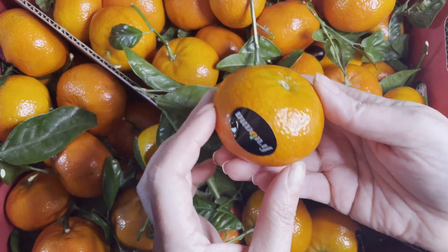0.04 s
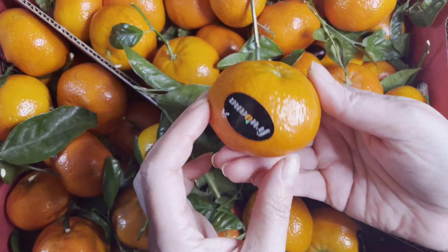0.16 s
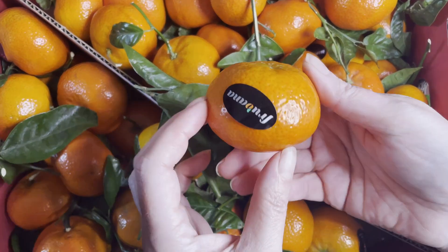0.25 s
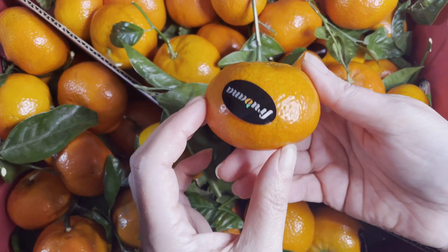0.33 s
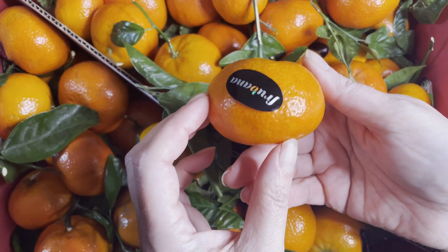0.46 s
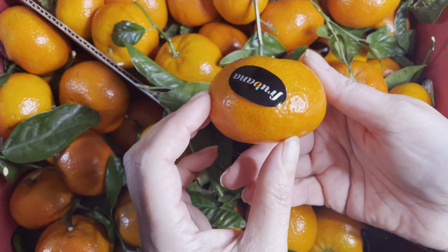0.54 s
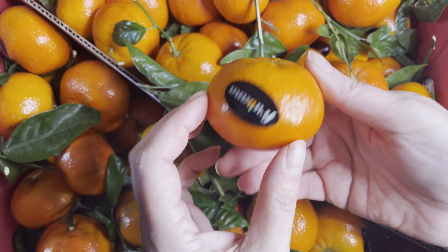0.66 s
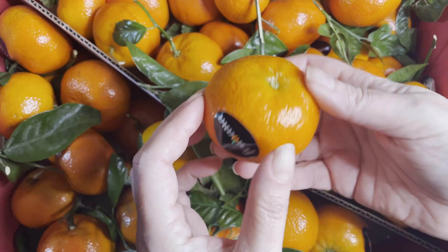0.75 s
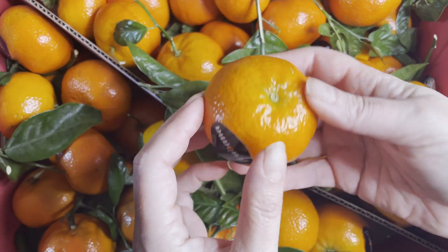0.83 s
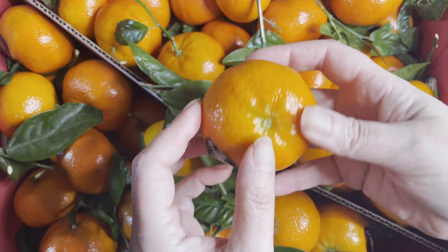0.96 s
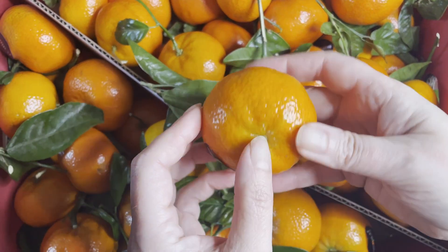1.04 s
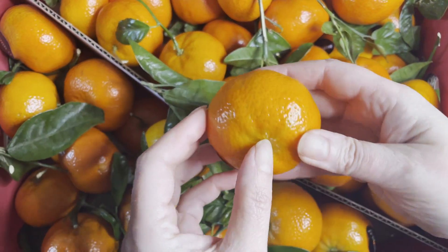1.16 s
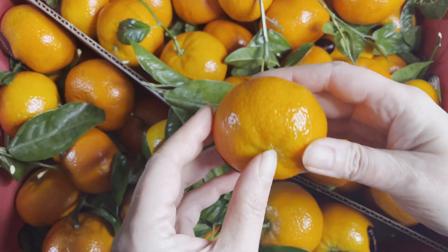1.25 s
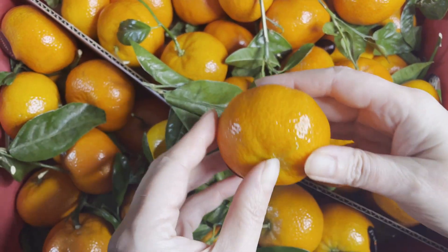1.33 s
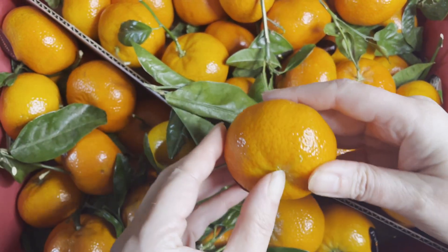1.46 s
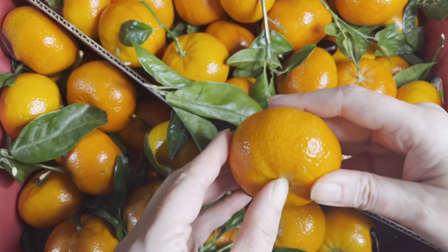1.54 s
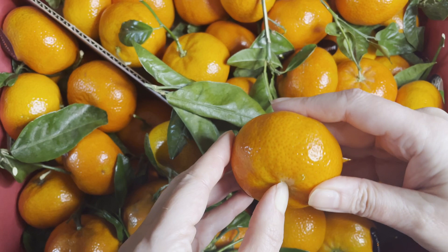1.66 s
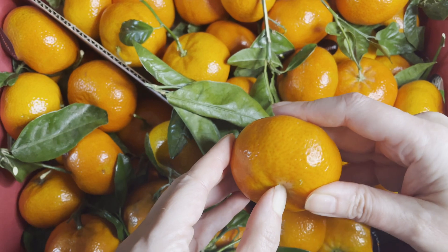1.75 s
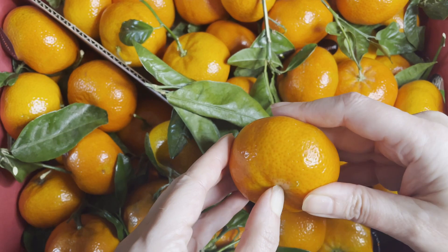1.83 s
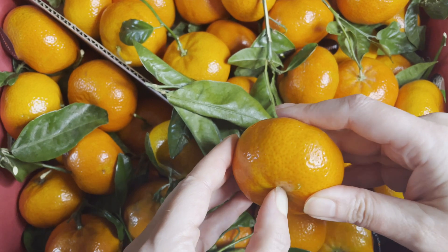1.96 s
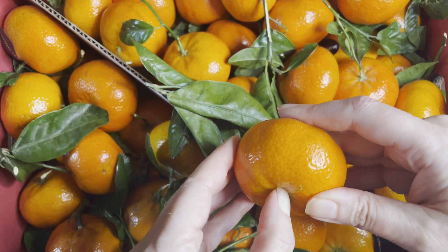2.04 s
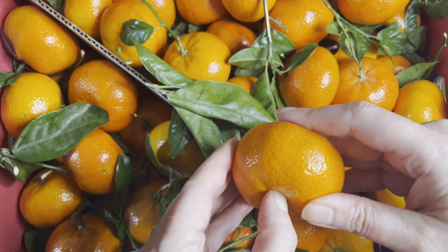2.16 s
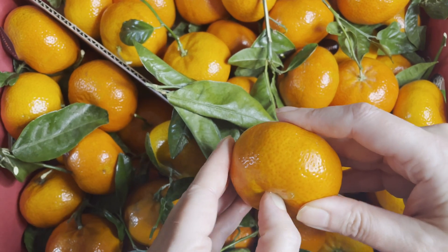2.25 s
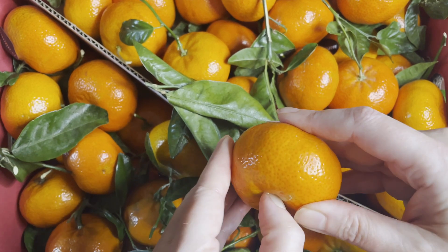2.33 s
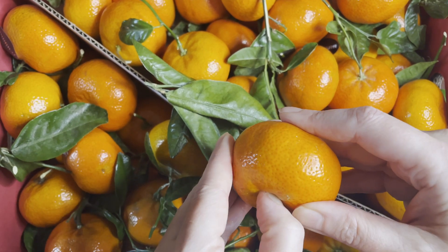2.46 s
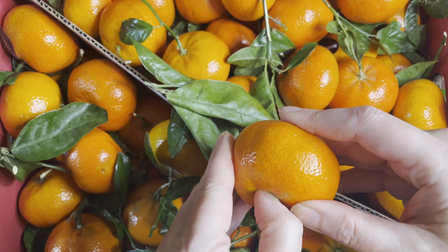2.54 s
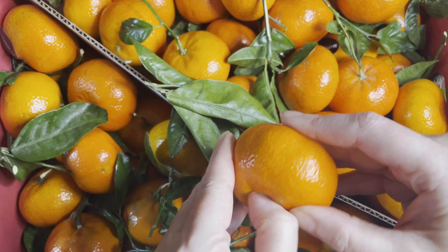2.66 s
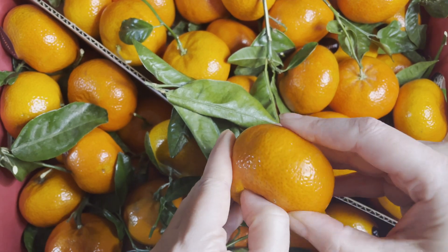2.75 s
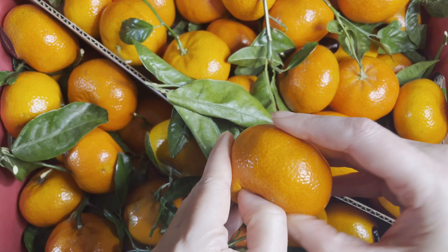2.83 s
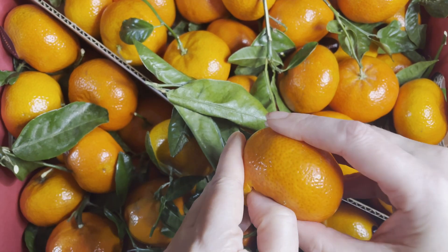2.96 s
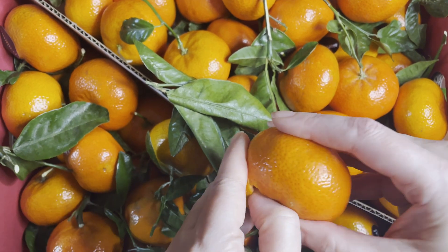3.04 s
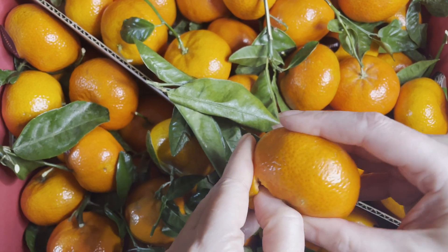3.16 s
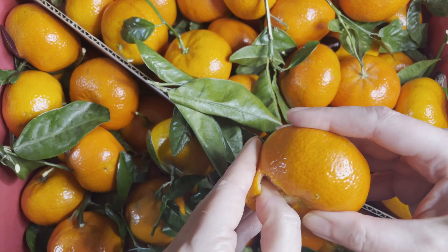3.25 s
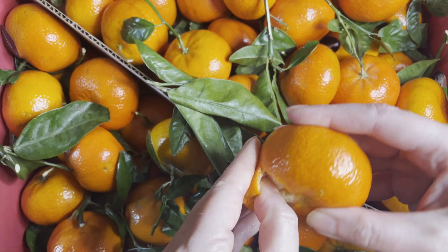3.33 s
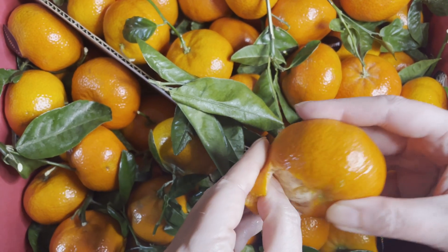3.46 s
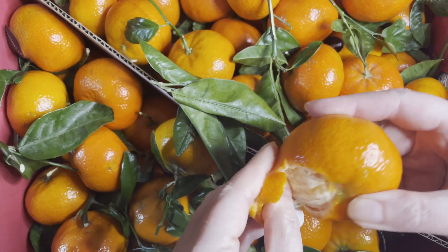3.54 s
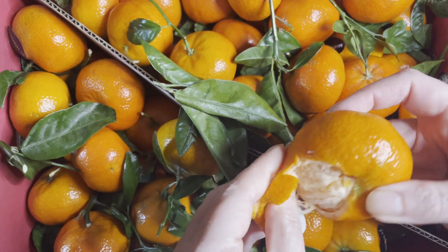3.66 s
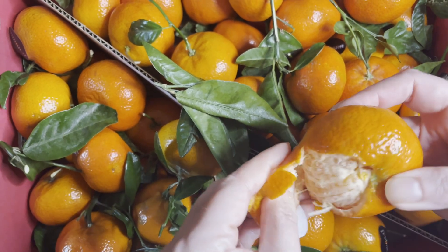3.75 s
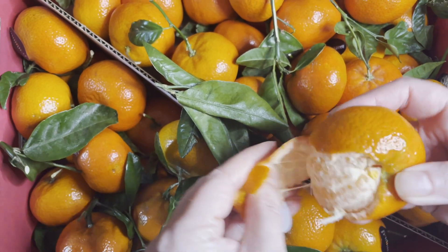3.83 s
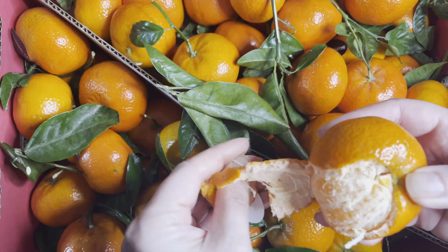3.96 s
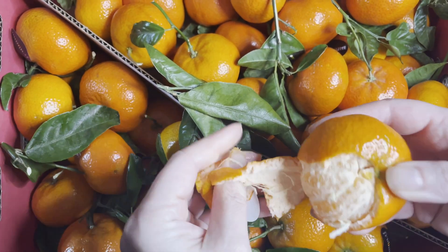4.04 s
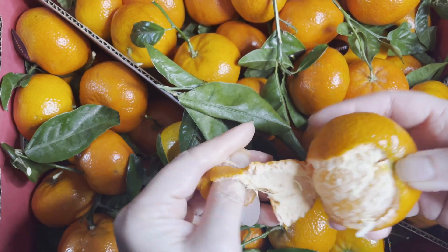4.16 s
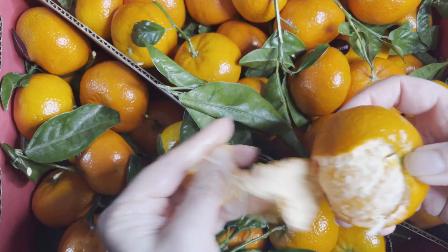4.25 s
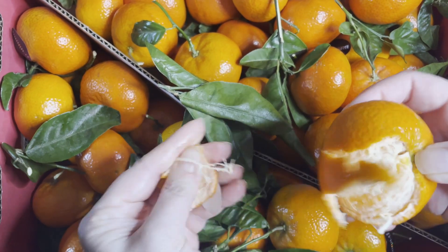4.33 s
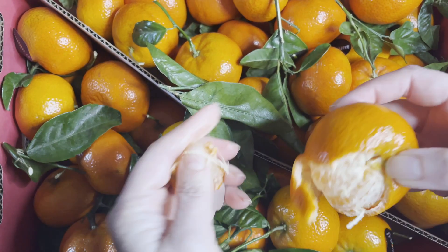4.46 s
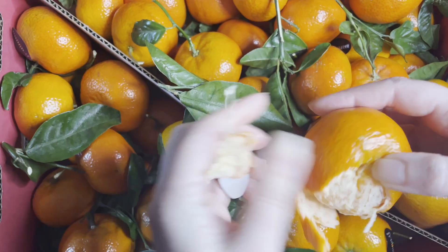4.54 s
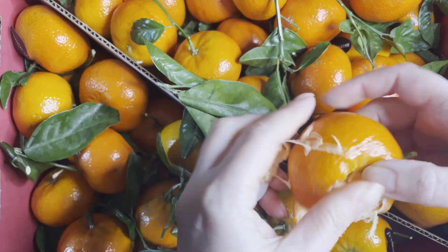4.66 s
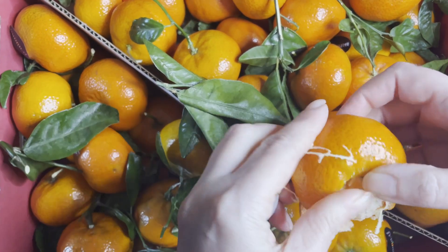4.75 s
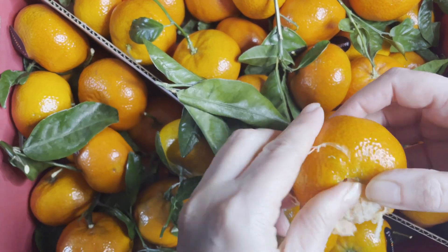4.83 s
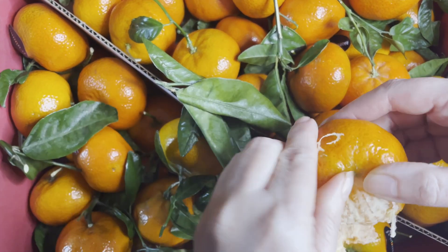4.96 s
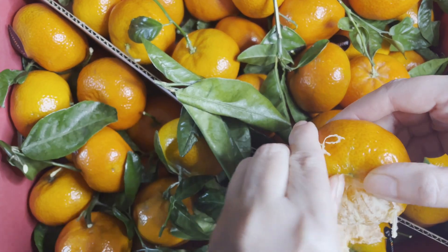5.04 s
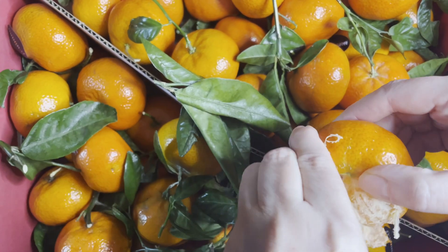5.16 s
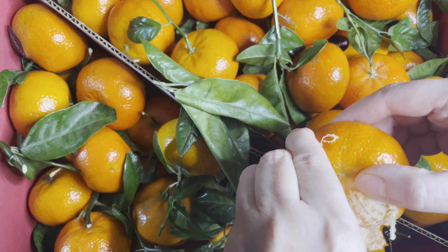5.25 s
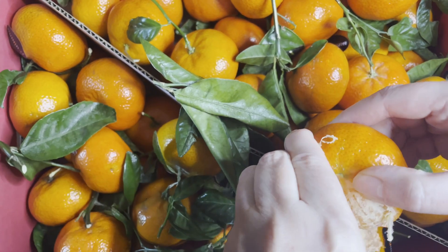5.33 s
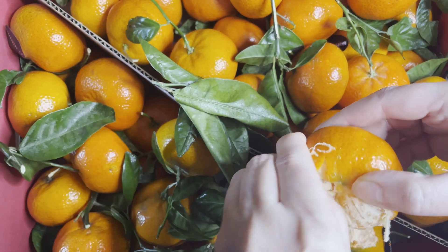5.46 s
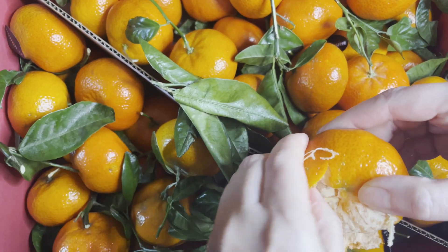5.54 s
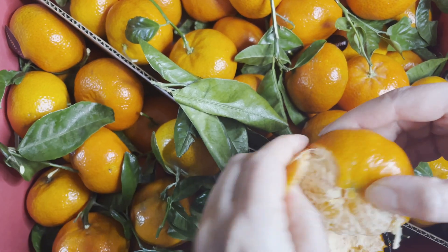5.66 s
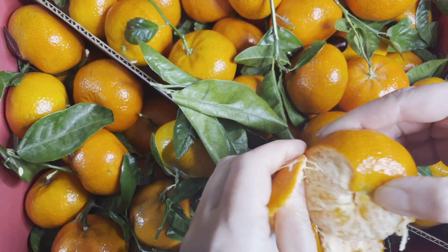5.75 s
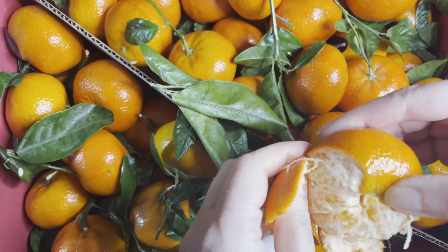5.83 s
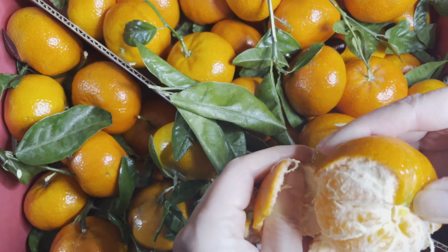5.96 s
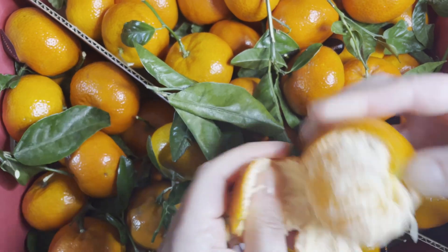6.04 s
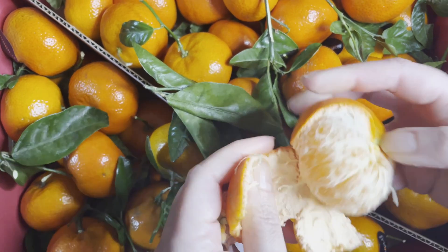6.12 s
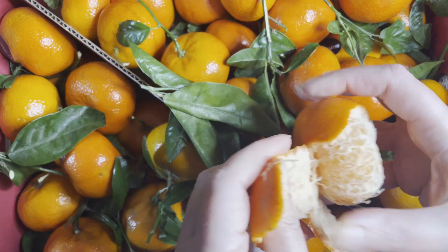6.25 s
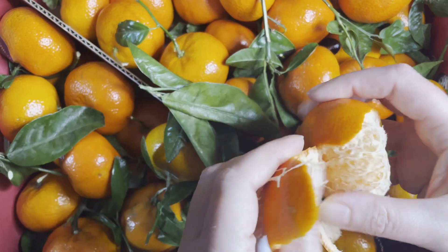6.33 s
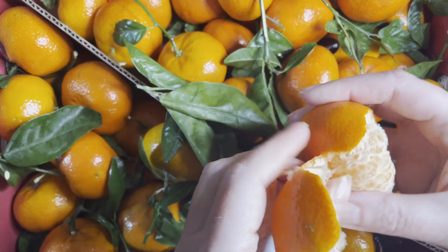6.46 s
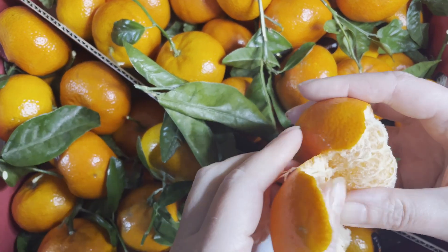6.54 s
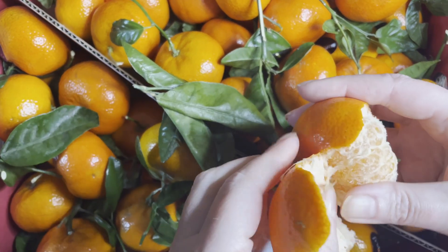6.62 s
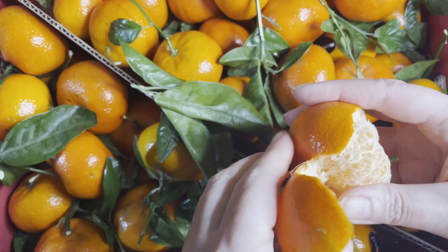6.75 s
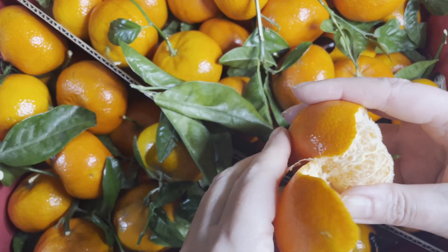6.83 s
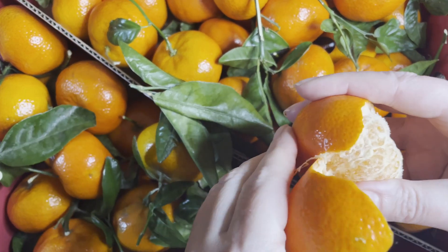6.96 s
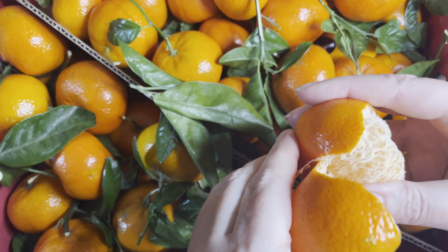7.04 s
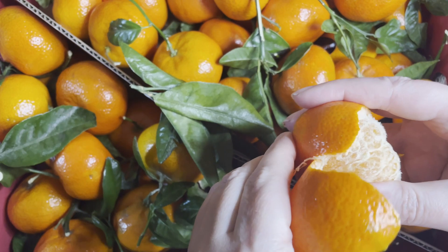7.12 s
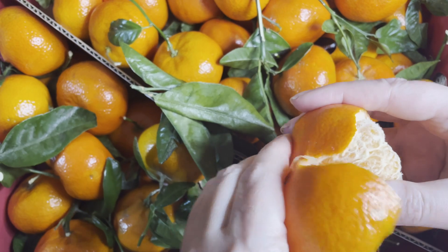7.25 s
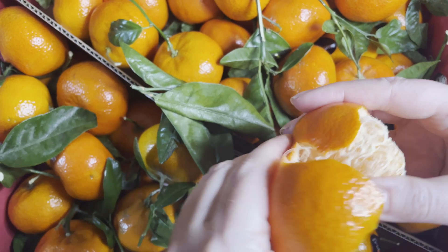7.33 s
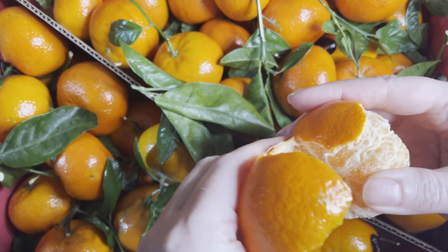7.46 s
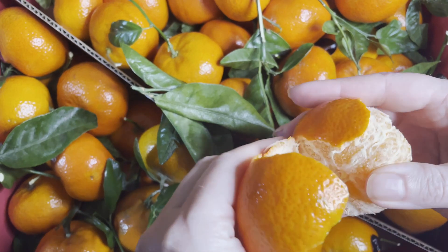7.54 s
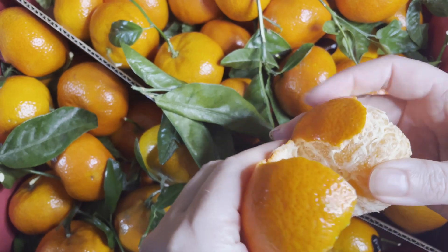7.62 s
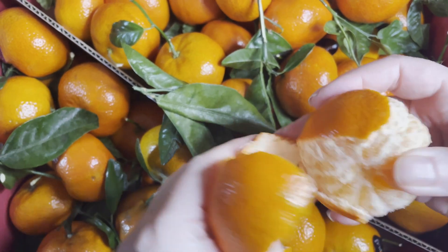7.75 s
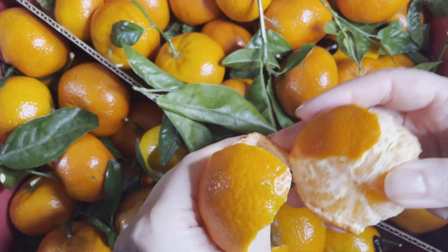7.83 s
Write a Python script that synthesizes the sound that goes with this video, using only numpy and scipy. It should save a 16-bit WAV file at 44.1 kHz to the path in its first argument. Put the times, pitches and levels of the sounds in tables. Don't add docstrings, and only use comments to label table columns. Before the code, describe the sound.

In a quiet room with a constant low appliance hum, fingers barely rub a mandarin. After two seconds a nail pops through the rind with sharp cracks and a tiny hiss of oil, then peel tears off in three crackling, moist bursts with faint rustles between. The last ends in a hollow snap. Very close stereo phone microphone, almost no echo.

```python
import sys
import numpy as np
from scipy import signal
from scipy.fft import rfft, irfft
from scipy.io import wavfile
from scipy.ndimage import uniform_filter1d

SR = 44100
rng = np.random.default_rng(int(sys.argv[2]) if len(sys.argv) > 2 else 0)


def inscribe(sig):
    pcm = np.round(np.clip(np.atleast_2d(sig).T, -1, 1) * 32767)
    wavfile.write(sys.argv[1], SR, pcm.astype(np.int16))


def natural_amplitude(level_db):
    exponent = np.asarray(level_db, float) / 20
    return 10 ** exponent


N = 347949

# start in seconds, hollow [dB], rind [dB], wet fizz [dB], hollow pitch [Hz].
CRACKS = [(1.078, -52, -73, -70, 1303), (1.784, -39, -41.5, -21.5, 2150), (2.065, -27, -40.5, -40.5, 1460),
          (2.072, -37.5, -53, -59, 1720), (2.102, -39, -50.5, -43.5, 1580),
          (2.177, -44.5, -66.5, -55, 1620), (2.302, -62.5, -24, -14, 2602),
          (2.315, -72.5, -24.5, -18, 2565), (2.353, -31, -12, -10, 1766),
          (2.646, -54.5, -47.5, -52.5, 1728), (2.753, -26, -16.5, -14, 1600), (2.79, -77, -42, -44, 1950),
          (2.886, -40.5, -36.5, -56.5, 1860), (2.917, -68.5, -47, -39.5, 1484),
          (2.999, -43.5, -36.5, -49, 1764), (3.037, -42.5, -48, -46.5, 1470),
          (3.073, -46, -39.5, -38, 2224), (3.418, -31, -18.5, -18, 2330), (3.456, -17.5, -15, -13, 3285),
          (4.645, -45, -39, -49, 1012), (4.935, -34.5, -44.5, -48.5, 2066), (6.591, -42, -44, -45, 2754),
          (7.225, -23.5, -26.5, -35.5, 2570), (7.847, -18, -31.5, -36, 1964)]
# start in seconds, strength [dB], tautness as rind over hollow [dB].
FIRST_STRIP = [(3.142, -48.5, 9.5), (3.15, -38.5, 5), (3.162, -36, -6.5), (3.184, -57, 24),
               (3.206, -36.5, 2), (3.234, -45, 13), (3.255, -41.5, 9.5), (3.371, -44, 3),
               (3.395, -43, 12.5), (3.398, -52, 16), (3.465, -30, 1), (3.501, -43.5, 8), (3.559, -42, 6.5),
               (3.568, -36.5, -1.5), (3.581, -35, -0.5), (3.675, -44.5, 8), (3.678, -42, 2),
               (3.692, -45, 12), (3.713, -40.5, 3), (3.722, -42, 11.5), (3.735, -34.5, 4.5),
               (3.782, -35, 1), (3.809, -31.5, -5), (3.818, -37, 1.5), (3.84, -55.5, 2), (3.864, -34.5, 2),
               (3.892, -39.5, -1), (4.24, -50.5, 8), (4.762, -62.5, 11.5)]
SECOND_STRIP = [(5.282, -44, -6.5), (5.302, -38.5, -1), (5.329, -41.5, 4.5), (5.358, -38.5, 7.5),
                (5.38, -39.5, -16), (5.426, -35, -4.5), (5.504, -51.5, 1.5), (5.532, -46, -8),
                (5.615, -33, -1.5), (5.636, -28.5, 2.5), (5.652, -31.5, 6), (5.658, -26.5, -9.5),
                (5.666, -33.5, 5.5), (5.674, -28, -9), (5.693, -32.5, -22.5), (5.823, -42.5, -3.5),
                (5.85, -47.5, -9.5), (5.873, -32, 3.5), (5.889, -25.5, -9), (5.9, -26.5, -8),
                (5.907, -24, -20.5), (5.919, -23.5, -5.5), (5.927, -28, -7.5), (5.942, -28.5, -18),
                (5.971, -52, 11.5), (6.138, -62.5, 18.5), (6.251, -45.5, 1.5), (6.418, -59, -10.5),
                (6.721, -60.5, 2), (6.818, -53, -8)]
THIRD_STRIP = [(7.069, -49.5, 2.5), (7.114, -43.5, -18.5), (7.121, -44, -13.5), (7.239, -26.5, -7.5),
               (7.256, -27, -29.5), (7.261, -27, -1.5), (7.269, -30, -18.5), (7.276, -28.5, -0.5),
               (7.289, -31.5, -7.5), (7.307, -32, -16.5), (7.321, -37.5, -4.5), (7.34, -42, -19.5),
               (7.393, -30, -15), (7.404, -35.5, -6.5), (7.42, -34, -15), (7.445, -26, -19),
               (7.464, -36.5, -6.5), (7.481, -39.5, -22.5), (7.495, -36.5, -2), (7.509, -36.5, -8),
               (7.647, -35.5, -8.5), (7.661, -37.5, -8.5), (7.704, -27.5, -5.5), (7.71, -33, -5.5),
               (7.734, -33.5, -0.5), (7.754, -30, -3.5), (7.76, -31, -4.5), (7.79, -36, 6.5)]
STRIP_WET_DB = [-3, -9.5, -4]
# start in seconds, hollow [dB], rind [dB], wet fizz [dB].
EARLY_TICKS = [(0.953, -66.5, -79.5, -92.5), (1.085, -70.5, -60.5, -72.5), (1.895, -67, -84, -75),
               (1.934, -54.5, -80.5, -63), (2.086, -58.5, -53, -42.5), (2.093, -60.5, -62, -47),
               (2.112, -63.5, -67.5, -53.5), (2.133, -68.5, -70.5, -59), (2.189, -58, -56, -49.5),
               (2.277, -70, -51.5, -50.5), (2.283, -72.5, -52, -39.5), (2.658, -50, -63, -65.5),
               (2.685, -61.5, -64, -53), (2.7, -49.5, -51.5, -53), (2.728, -71, -56.5, -60),
               (2.765, -62.5, -49.5, -59), (3.098, -55, -63.5, -51), (3.164, -34.5, -50.5, -54),
               (3.172, -53.5, -56.5, -67.5), (3.187, -50.5, -54.5, -52.5), (3.21, -39, -45.5, -53),
               (3.23, -55, -45, -53.5), (3.271, -56, -53.5, -60.5), (3.342, -51, -59, -58),
               (3.362, -63, -43.5, -58.5), (3.432, -56, -38, -39.5), (3.442, -50, -38.5, -45),
               (3.478, -51.5, -44.5, -42.5), (3.485, -48.5, -45, -52), (3.516, -57.5, -43.5, -48),
               (3.546, -55, -42, -47), (3.551, -42.5, -39, -54.5), (3.601, -62, -53.5, -48.5),
               (3.747, -54, -49, -51.5), (3.761, -51.5, -52, -53.5), (3.77, -44, -47, -54.5),
               (3.792, -41.5, -35.5, -43), (3.804, -36, -36.5, -46.5), (3.842, -51.5, -37.5, -47.5),
               (3.853, -62.5, -54.5, -48.5), (3.885, -52.5, -45, -48.5), (3.91, -42.5, -40.5, -49)]
LATE_TICKS = [(4.037, -67, -59.5, -68), (4.044, -70, -51, -66.5), (4.093, -64.5, -58.5, -63),
              (4.442, -79, -63, -56), (4.883, -58.5, -73.5, -77.5), (5.316, -56.5, -49, -54.5),
              (5.342, -58.5, -40.5, -61.5), (5.351, -48, -41, -57.5), (5.393, -55.5, -57, -58),
              (5.586, -45, -51, -66), (5.608, -42.5, -50.5, -54.5), (5.619, -34.5, -36.5, -49.5),
              (5.628, -37, -37, -34.5), (5.641, -29, -27, -44), (5.677, -31.5, -40.5, -48),
              (5.689, -35, -49, -55), (5.714, -45.5, -49, -56.5), (5.735, -42.5, -43.5, -52.5),
              (5.798, -45, -43.5, -48), (5.803, -43.5, -50.5, -48.5), (5.859, -51.5, -51.5, -49),
              (5.865, -42.5, -39.5, -45.5), (5.893, -32.5, -45, -48), (5.904, -35, -37, -50.5),
              (5.923, -42.5, -40.5, -56), (5.958, -52.5, -49.5, -52), (6.771, -58.5, -59, -74),
              (6.847, -66, -57, -71), (7.194, -54.5, -58.5, -53), (7.216, -59.5, -57, -56.5),
              (7.362, -47.5, -52, -60.5), (7.382, -41.5, -64, -65.5), (7.397, -48, -50, -67.5),
              (7.442, -53.5, -45, -59.5), (7.544, -58.5, -52.5, -64), (7.637, -48.5, -46, -60.5),
              (7.672, -48, -48.5, -58), (7.684, -41.5, -47.5, -50), (7.697, -39.5, -45, -54),
              (7.721, -50, -47, -44.5), (7.729, -35, -35.5, -48.5), (7.745, -31.5, -38.5, -52.5),
              (7.777, -39.5, -51.5, -53), (7.804, -40.5, -36, -52.5)]
# time in seconds, pitch [Hz].
HOLLOW_PITCH = [(3.14, 1947), (3.5, 2850), (3.67, 1930), (3.8, 2980), (3.87, 1808), (4.76, 1553),
                (5.28, 1729), (5.43, 2049), (5.64, 2840), (5.95, 2542), (6.42, 1587), (7.12, 1364),
                (7.24, 2163), (7.4, 1873), (7.45, 2454), (7.79, 2296)]


def fibre_breaks():
    crack_s, fibre_s, tick_s = .0005, .00065, .0004
    pitch_spread_db, wet_spread_db, length_spread_db = 1.8641, 5, 2.5
    pitch_s, pitch_hz = np.transpose(HOLLOW_PITCH)
    rows = [(*row, crack_s) for row in CRACKS]
    for strip, wet_db in zip([FIRST_STRIP, SECOND_STRIP, THIRD_STRIP], STRIP_WET_DB):
        for (s, db, taut_db), (a, b, c) in zip(strip, rng.standard_normal((30, 3))):
            hz = np.interp(s, pitch_s, pitch_hz) * natural_amplitude(pitch_spread_db * a)
            rind_db = db + taut_db
            fizz_db = rind_db + wet_db + wet_spread_db * b
            rows.append((s, db, rind_db, fizz_db, hz, fibre_s * natural_amplitude(length_spread_db * c)))
    for (s, *part_db), a in zip(EARLY_TICKS + LATE_TICKS, rng.standard_normal(120)):
        hz = np.interp(s, pitch_s, pitch_hz) * natural_amplitude(pitch_spread_db * a)
        rows.append((s, *part_db, hz, tick_s))
    return rows


# centre [Hz], width [Hz], level [dB].
HOLLOW = [(607.6, 840, -10.5), (1393.7, 613, -5.5), (2601.5, 1130, -4)]
RIND = [(3415, 800, -10.5), (4959.8, 2505, -1.5), (6005, 460, 1), (6864, 920, -5.5)]
FIZZ = [(8090, 3730, -5.5), (11000, 3300, -5.5), (13140, 2300, -10), (15060, 1900, -10)]
# time in seconds, level against the rest [dB], pitch [Hz].
POCKET = [(3.0, -14.5, 2353), (3.8, -10.5, 2898), (4.2, -1.5, 2290), (4.5, -19, 2311), (5.3, -14, 2173),
          (5.65, -9, 2904), (5.9, -8.5, 2807), (6.6, -14, 2498), (6.8, -4.5, 2512), (7.1, -13, 2508),
          (7.25, -1, 2606), (7.7, -3, 2450), (7.89, -17.5, 2436)]
POCKET_WIDTH_HZ = 500


def snaps():
    out, t = np.zeros((2, N + 1024)), np.arange(1024) / SR
    pocket_s, pocket_levels, pocket_pitches = np.transpose(POCKET)
    for s, *part_db, hz, length in fibre_breaks():
        breaks = rng.standard_normal((2, 1024))
        length = np.clip(length, 2e-4, 3e-3)
        burst = breaks * (t / length * np.exp(1 - t / length) + .05 * np.exp(-t / .005))
        main_break = round(length * SR) + np.array([0, 9])
        burst[:, main_break] += 5.486 * np.sign(breaks[:, :2]) * [1, .4]

        taut_db = part_db[1 + 1] - part_db[0]
        slack_db = np.clip(-.5 * taut_db, -12, 10)
        hollow = [(f, w, (slack_db - 2.5) * (f < 1000) - 13.43 * np.log2(f / hz) ** 2)
                  for f, w, _ in HOLLOW]
        hollow.append((hz, .5 * hz, -5.0))
        pocket_db = np.interp(s, pocket_s, pocket_levels)
        pocket_hz = np.interp(s, pocket_s, pocket_pitches)
        pocket_db = pocket_db - 2.0 - 15.0 * np.log2(pocket_hz / hz) ** 2
        hollow.append((pocket_hz, POCKET_WIDTH_HZ, pocket_db))
        taut = np.clip(taut_db / 18, 0, 1)
        rind = [(f, w, db - 17.0 * taut * (f < 5000)) for f, w, db in RIND]

        peak_db = np.add(part_db, [1.0, 1.0, 2.5])
        start = round((s - 1.2 * length) * SR)
        for side in range(2):
            parts = [ring(burst[side], modes) for modes in (hollow, rind, FIZZ)]
            snap = sum(natural_amplitude(db) * part / abs(part).max() for part, db in zip(parts, peak_db))
            out[side, start:][:1024] += snap
    return out[:, :N]


# peak time in seconds, peak [dB], rise over 20 dB [s], fall over 20 dB [s],
# wet fizz over pull [dB].
TOUCHES = [(0, -76, .02, 0.17, -4), (.03, -95.5, 4.9, -0.35, 12), (.192, -95, -0.02, -1.27, 14.5),
           (.453, -70.5, 0.1058, 0.09, -33), (.632, -94.5, -0.2, 0.03, 14), (1.05, -78, -0.26, 0.23, -14),
           (1.08, -67.5, -0.68, 0.0642, -20), (1.17, -92, -0.13, 0.24, 6), (1.796, -73.5, -0.01, 0.1, 2.5),
           (1.75, -80, 0.12, 0.24, -1.5), (1.871, -90, 0.18, -0.05, 13), (1.94, -68, 0.0917, 0.04, -28.5),
           (2.37, -67.5, 0.14, 0.193, 8.5), (2.287, -65, 0.1109, 0.157, 12.5),
           (4.235, -59.5, 0.0657, 0.01, -1), (4.44, -75, -0.77, 0.62, 0), (4.36, -82.5, 0.47, 0.75, -5.5),
           (4.57, -80, 0.02, 0.04, 5), (4.62, -71.5, 0.13, 0.55, -8.5), (4.8, -70, 0.26, -0.56, -10),
           (4.883, -71.5, -0.53, -0.13, -22), (4.96, -69.5, 0.0751, 0.14, -14.5),
           (5.135, -73, -0.65, 0.21, -16.5), (5.05, -82, 0.07, 0.58, 1.5), (6.045, -73, -0.5, 0.27, 2.5),
           (6.265, -68.5, 0.15, .2, -11.5), (6.596, -68, 0.07, 0.06, -11.5),
           (6.77, -67, 0.2441, 0.16, -7.5), (7.123, -70.5, 0.68, 1.5, -5)]
PULLS = [(2.09, -57.5, 0.039, 0.161, -17), (2.2, -63, 0.033, .06, 11.5), (2.266, -69, 0.048, 0.12, 12.5),
         (2.314, -57, 0.12, 0.175, 2.5), (2.663, -56.5, .06, 0.104, -10), (2.764, -56.5, 0.035, 0.192, -4),
         (2.83, -64, .15, 0.35, -3.5), (3.128, -64, .4, 0.18, -4), (3.169, -49.5, 0.034, 0.2305, -4.5),
         (3.455, -47, 0.093, 0.165, -3.5), (3.55, -58, .1, 0.27, -5), (3.718, -54, 0.075, 0.345, -2),
         (3.836, -44, 0.18, 0.086, -8.5), (4.166, -70.5, 0.886, 0.234, -4), (5.33, -54.5, .05, 0.166, -9.5),
         (5.372, -50.5, 0.065, 0.0957, -12.5), (5.57, -60.5, 0.23, .06, -7.5),
         (5.642, -37.5, 0.049, 0.095, -6.5), (5.891, -43, 0.1, 0.1142, -10.5),
         (7.24, -46, 0.061, 0.2385, -13.5), (7.495, -51.5, 0.28, 0.0563, -13.5),
         (7.638, -52, 0.02157, 0.208, -8), (7.739, -41, 0.071, 0.0622, -10),
         (7.85, -62.5, 0.084, 0.144, -14.5)]


def effort():
    t = np.arange(0, N / SR, .002)
    pull, fizz = natural_amplitude(2 * -94), natural_amplitude(2 * -102)
    for s, peak_db, rise, fall, wet_db in TOUCHES + PULLS:
        distance = np.maximum((s - t) / abs(rise), (t - s) / abs(fall))
        power = natural_amplitude(2 * peak_db - 40 * distance)
        pull = pull + power
        fizz = fizz + power * natural_amplitude(2 * wet_db)
    unsteady_db = 1.6 * evened(uniform_filter1d(rng.standard_normal((2, len(t))), size=20))
    pull_db = 10 * np.log10(pull) + unsteady_db[0]
    fizz_db = 10 * np.log10(fizz) + unsteady_db[1]
    return curves(np.transpose([t, pull_db, fizz_db]))


# time in seconds, pitch factor.
OPENING = [
    (2.6, 0.677),
    (3.0, 0.92),
]


def tearing():
    pull_db, fizz_db = effort()
    clumps = natural_amplitude(2.8 * wander(220))
    size = natural_amplitude(2.0 * np.minimum(rng.exponential(1, N), 4))
    size = size * (rng.random(N) < 4000 / SR) * clumps
    crackle = np.clip((pull_db + 84.5) / 30, 0, .9)
    shift = 1 + 0.092 * wander(900)
    hollow = np.clip(0.4275 + 0.026 * (pull_db - fizz_db), .3, .985)
    flap_gain = natural_amplitude(np.clip(0.26 * (pull_db + 47.5), -9, 2))
    opening = shift * curves(OPENING)[0]
    pocket_db, pocket_hz = curves(POCKET)
    pocket_gain = natural_amplitude(pocket_db)
    top_hz, top_width, top_db = FIZZ[-1]
    fizz_modes = FIZZ[:-1] + [(top_hz, top_width, top_db - 1.5)]
    out = []
    for chance in rng.standard_normal((2, 2, N)):
        drive = np.sqrt(crackle) * evened(size * chance[0]) + np.sqrt(1 - crackle) * chance[1]
        flap = ring(drive, HOLLOW[:1], opening) * flap_gain
        cavity = evened(flap - ring(drive, HOLLOW[1:], opening))
        rind = evened(ring(drive, RIND, shift))
        body = hollow * cavity + np.sqrt(1 - hollow ** 2) * rind
        pocket = pocket_gain * evened(resonate(drive, pocket_hz, POCKET_WIDTH_HZ))
        body = (body + hollow * pocket) / np.sqrt(1 + (hollow * pocket_gain) ** 2)
        fizz = evened(ring(drive, fizz_modes))
        out.append(natural_amplitude(pull_db - 2.0) * body + natural_amplitude(fizz_db - 1.0) * fizz)
    return np.array(out)


# time in seconds, level [dB], pitch [Hz].
SPRAY = [
    (2.18, -54.5, 11000),
    (2.2, -46, 9200),
    (2.232, -48.5, 7800),
    (2.26, -47.5, 9530),
    (2.285, -63.5, 10400),
]
# time in seconds, lift [dB].
SPURTS = [(2.19, 13), (2.201, 12), (2.21, 9), (2.217, 5.5), (2.244, 6), (2.257, 8.5), (2.263, 11)]


def spray():
    level_db, hz = curves(SPRAY)
    t = np.arange(N) / SR
    gate = np.clip(np.minimum(t - SPRAY[0][0], SPRAY[-1][0] - t) / 0.0098, 0, 1)
    sputter = natural_amplitude(2.5 * wander(120))
    spurts_db = sum(db * np.exp(-((t - s) / .0025) ** 2) for s, db in SPURTS)
    moving_hz = hz * (1 + 0.044 * np.log(sputter))
    hiss = evened(resonate(sputter * rng.standard_normal(N), moving_hz, 650))
    return natural_amplitude(level_db - 6.5 + spurts_db) * gate * hiss


# time in seconds, peak [dB], pitch [Hz].
KNOCK = [
    (7.635, -39, 288),
    (7.656, -43.5, 171),
]
# time in seconds, peak [dB], pitch [Hz].
JOLTS = [(2.066, -37, 969), (2.353, -37, 800), (2.999, -54, 1000), (3.455, -41, 1100), (3.568, -46, 1150),
         (3.864, -50, 503), (4.935, -48, 1050), (5.928, -43, 500), (5.944, -50.5, 501), (7.225, -55, 650),
         (7.32, -48.5, 500), (7.392, -52.5, 601), (7.445, -46, 650), (7.756, -45.5, 603),
         (7.847, -29.5, 850)]
# time in seconds, peak [dB], pitch [Hz].
PINGS = [(1.784, -21, 10080), (1.784, -52.5, 4530), (2.302, -22, 6560), (2.353, -22.5, 9660),
         (2.753, -14.5, 6454), (3.418, -24, 4287), (3.455, -21, 3950), (3.455, -25, 2250),
         (3.568, -30.5, 4408), (4.645, -54, 2387), (4.935, -41, 1814), (6.592, -44.5, 3628),
         (7.226, -28.5, 2270), (7.847, -31.5, 6400)]


def knock():
    out, t = np.zeros(N + 5000), np.arange(5000) / SR
    click = (t == 0) * 1.
    for s, peak_db, hz in KNOCK:
        blow = rng.standard_normal(5000) * natural_amplitude(-60 * t / 0.17) * 0.132 + click * 9
        thud = ring(blow, [(hz, 60, 0), (0.49 * hz, 50, -3.0), (2.826 * hz, 250, -17)])
        out[round((s - .004) * SR):][:5000] += natural_amplitude(peak_db + 1.0) * thud / abs(thud).max()
    for s, peak_db, hz in JOLTS:
        jolt = ring(click, [(hz, 0.75 * hz, 0), (0.678 * hz, 0.68 * hz, -3.0)])
        out[round(s * SR):][:5000] += natural_amplitude(peak_db) * jolt / abs(jolt).max()
    for s, peak_db, hz in PINGS:
        ping = resonate(click, hz, 0.24 * hz)
        out[round(s * SR):][:5000] += natural_amplitude(peak_db) * ping / abs(ping).max()
    return out[:N]


def near_room(x):
    t = np.arange(6000) / SR
    tail = rng.standard_normal((2, 6000)) * natural_amplitude(-60 * t / 0.022) * (t > .002)
    tail = tail / np.linalg.norm(tail[0])
    return natural_amplitude(-28) * signal.oaconvolve(x, tail, axes=1)[:, :N]


# time in seconds, level [dB].
HUM = [
    (0.0, -49.5),
    (0.42, -60),
    (0.46, -52.5),
    (7.85, -53.5),
    (7.89, -50.5),
]
# centre [Hz], width [Hz], level [dB].
DRONE = [(119.51, 3.2, -64), (166.73, 13, -66), (191.42, 7.0, -67), (1154, 40, -99)]
# frequency [Hz], level [dB per Hz].
AIR = [(22, -112), (50, -80), (80, -81), (140, -86), (230, -86), (320, -94.5), (420, -101), (650, -110),
       (1100, -116), (2000, -123), (5000, -124), (8000, -128), (13000, -135), (16500, -143)]
# frequency [Hz], likeness [0-1].
AIR_SAME = [(300, .92), (600, .12), (2000, .45), (5500, .3), (6900, .99), (12000, .95), (15000, .7)]


def hum():
    swelling = natural_amplitude(curves(HUM)[0]) * wavering(250.24, 0.448, 11.46)
    mains = natural_amplitude(-60.5) * wavering(59.25, 0.32, 3.3)
    hz, out = np.fft.rfftfreq(N, 1 / SR), []
    for noise in rng.standard_normal((2, N)):
        drones = sum(natural_amplitude(db) * evened(resonate(noise, f, w)) for f, w, db in DRONE)
        air = irfft(rfft(noise[::-1]) * natural_amplitude(read(AIR, hz)) * np.sqrt(SR / 2), N)
        out.append(drones + air)
    return ports(swelling + mains + out[0], out[1], AIR_SAME)


def wavering(hz, depth, rate):
    tone = np.sqrt(2) * np.sin(2 * np.pi * hz * np.arange(N) / SR)
    return tone + depth * evened(resonate(rng.standard_normal(N), hz, rate))


def wander(size):
    return evened(uniform_filter1d(rng.standard_normal(N), size=size))


def evened(x):
    return x / np.sqrt(np.mean(x ** 2) + 1e-20)


def read(points, hz):
    f, value = np.transpose(points)
    return np.interp(np.log(hz + 1), np.log(f + 1), value)


def curves(rows):
    s, *columns = np.transpose(rows)
    return [np.interp(np.arange(N) / SR, s, c) for c in columns]


def resonate(x, hz, width):
    turn = np.exp(2j * np.pi * np.cumsum(hz * np.ones(len(x))) / SR)
    r = np.exp(-np.pi * abs(width) / SR)
    smooth = signal.lfilter([(1 - r) ** 2], [1, -2 * r, r * r], x / turn)
    return 2 * (turn * smooth).real


def ring(x, modes, detune=1):
    return sum((-1) ** k * natural_amplitude(db) * resonate(x, f * detune, w) for k, (f, w, db) in enumerate(modes))


# frequency [Hz], phase the left leads by [radians].
PORTS = [(300, .2), (1800, -.1), (2600, .6), (5000, .8), (6400, 4.6), (7100, 3.25), (7600, 3.0),
         (8400, 2.1), (11000, 0), (13600, -2.4), (14600, -3.14), (15800, -4.0)]
# frequency [Hz], left over right [dB].
LEFT_DB = [(60, 1.2), (250, 2.8), (700, 3.8), (1300, 1.2), (2500, 1.6), (4500, 0)]


def ports(a, b, likeness):
    hz = np.fft.rfftfreq(N, 1 / SR)
    same = np.clip(read(likeness, hz), 0, 1)
    turn = np.exp(.5j * read(PORTS, hz))
    lean = natural_amplitude(read(LEFT_DB, hz) / 2)
    left = rfft(a)
    right = same * left + np.sqrt(1 - same ** 2) * rfft(b)
    return np.array([irfft(left * turn * lean, N), irfft(right / turn / lean, N)])


# frequency [Hz], likeness [0-1].
NEAR_SAME = [(600, 0.46), (1500, 0.956), (4200, 0.875), (5500, 0.32), (6700, 1), (7100, 0.9454),
             (7900, 0.9136), (8700, 1), (12500, 0.97), (14500, 0.92), (15700, 0.937)]


def scene():
    bass_cut = signal.butter(2, 330, "high", fs=SR)
    hands = signal.lfilter(*bass_cut, snaps() + tearing() + spray()) + knock()
    return ports(*(hands + near_room(hands)), NEAR_SAME) + hum()


def band_limit(x):
    return signal.sosfilt(signal.butter(12, 17030, fs=SR, output="sos"), x)


def record(dry):
    edge = signal.firwin(255, 16600, window=("kaiser", 8), fs=SR)
    mix = signal.oaconvolve(dry, edge[None], "same")
    return band_limit(mix)


dry = scene()
out = record(dry)
inscribe(out)
```